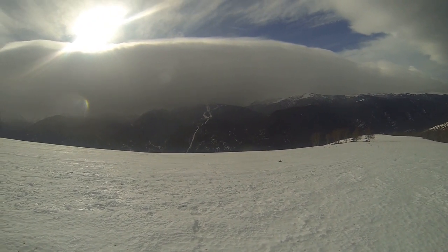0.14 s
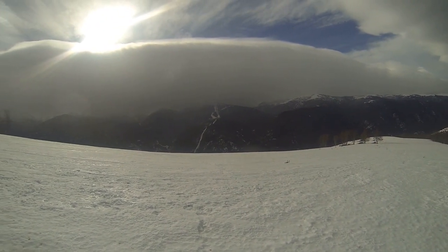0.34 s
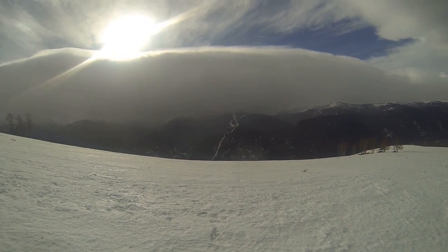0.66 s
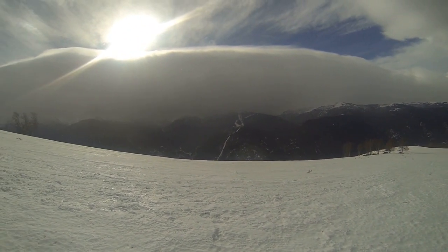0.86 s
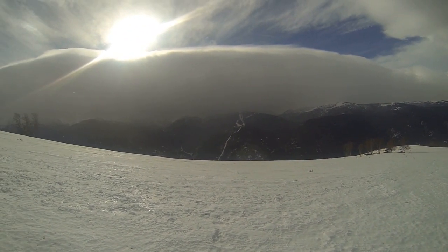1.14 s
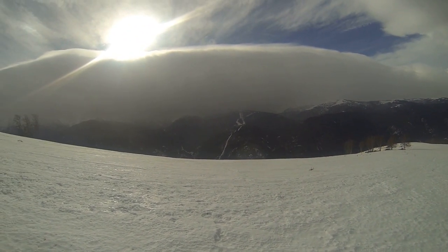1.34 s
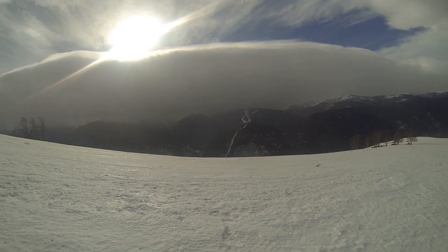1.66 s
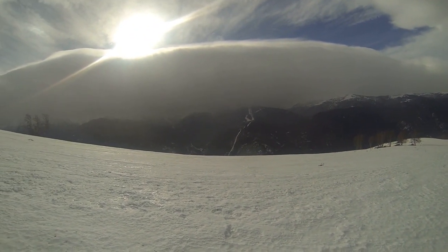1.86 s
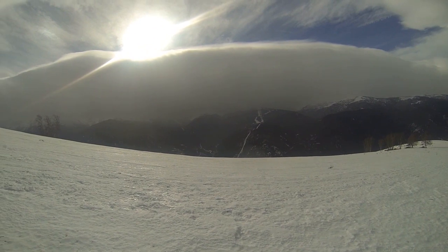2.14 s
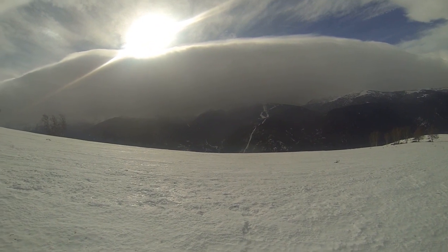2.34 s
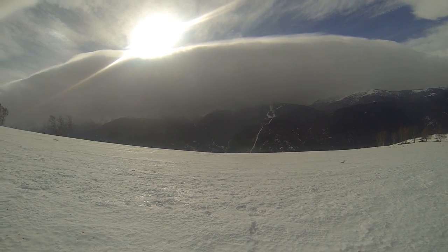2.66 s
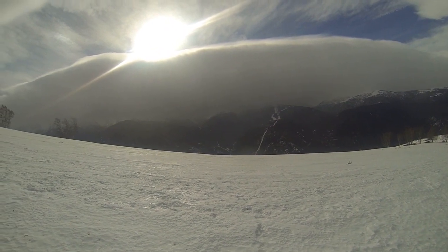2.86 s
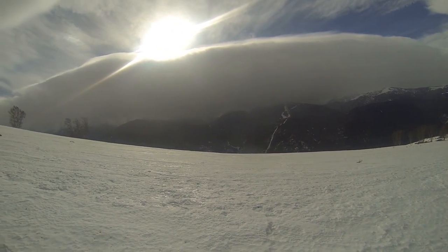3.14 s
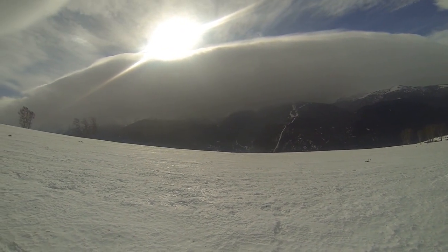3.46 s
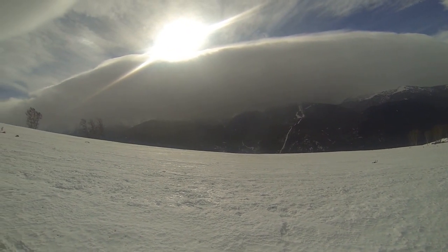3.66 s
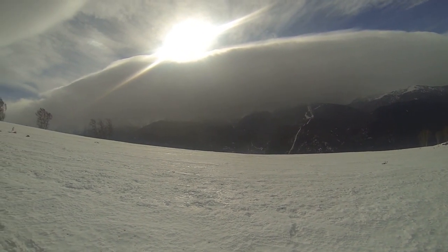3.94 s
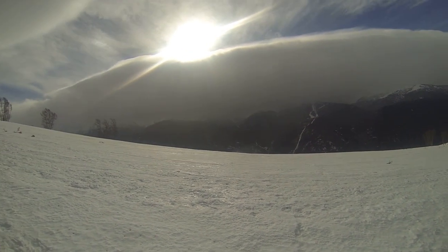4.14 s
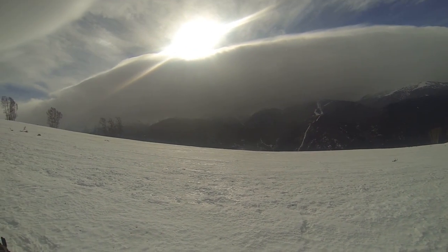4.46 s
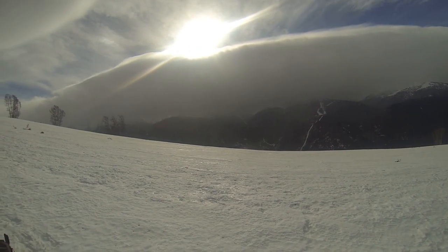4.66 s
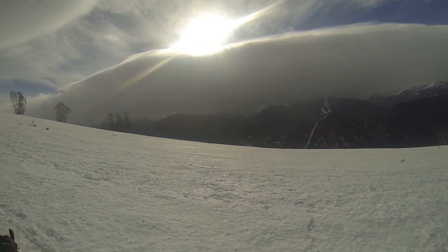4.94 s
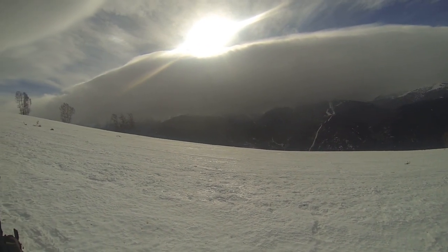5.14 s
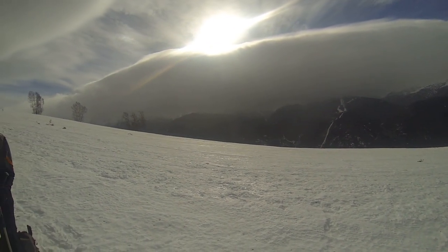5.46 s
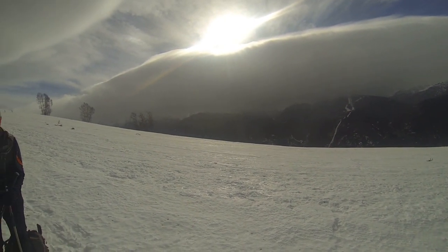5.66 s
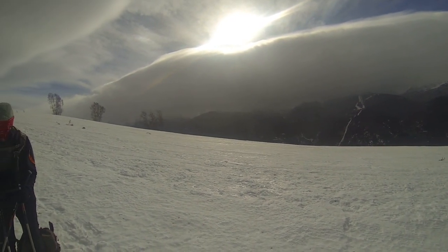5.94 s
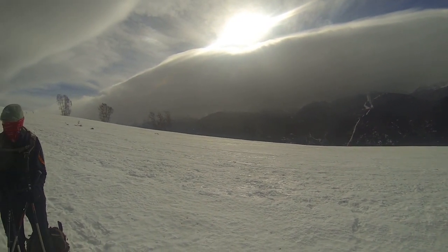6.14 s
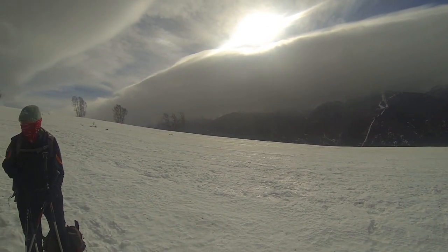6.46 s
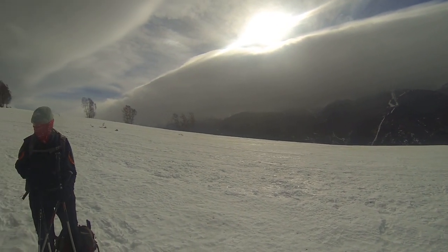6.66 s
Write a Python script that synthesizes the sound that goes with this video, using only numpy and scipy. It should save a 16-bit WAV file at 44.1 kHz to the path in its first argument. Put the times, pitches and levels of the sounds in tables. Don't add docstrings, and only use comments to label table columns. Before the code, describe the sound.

Deep, irregular wind thuds and a fluttering roar batter a small camera in the snow, with thin fizz and brief housing knocks.

```python
import sys
import numpy as np
from scipy import signal
from scipy.fft import rfft, irfft
from scipy.io import wavfile
from scipy.ndimage import uniform_filter1d, minimum_filter1d

SR = 44100
rng = np.random.default_rng(int(sys.argv[2]) if len(sys.argv) > 2 else 0)


def decibels_to_gain(level_db):
    exponent = np.asarray(level_db, float) / 20
    return 10 ** exponent


def persist_wave(psi):
    counts = np.round(np.clip(psi, -1, 1) * 32767).astype(np.int16)
    wavfile.write(sys.argv[1], SR, np.atleast_2d(counts).T)


N = 299880


def smooth_chance(rate_hz, low_hz=9):
    hz = np.fft.rfftfreq(N, 1 / SR)
    shape = (hz > low_hz) / np.sqrt(hz + 1) / (1 + (hz / rate_hz) ** 4)
    x = irfft(rfft(rng.standard_normal(N)) * shape, N)
    return x / x.std()


def add(mix, start_s, sound):
    part = mix[round(start_s * SR):][:len(sound)]
    part += sound[:len(part)]


def softened(x, size=90):
    return uniform_filter1d(uniform_filter1d(x, size), size)


def dulled(x, edge_hz):
    return signal.sosfilt(signal.butter(8, edge_hz, fs=SR, output="sos"), x)


def zero_phase_band(x, order, edge_hz, kind="low"):
    return signal.sosfiltfilt(signal.butter(order, edge_hz, kind, fs=SR, output="sos"), x)


def bumps(events, t):
    centre_s, length_s, level_db, colour_db = np.transpose(events)
    bell = np.exp(-(2 * (t[:, None] - centre_s) / length_s) ** 2)
    return bell @ level_db, bell @ colour_db


# time_s, speed_db,
# slicing_db (air sliding past the port), head_on_db (air hitting the port)
SLOPE_WIND = [(0.0, 3.5, -3.5, -1.5), (0.55, -7, -1.5, 1), (1.1, 0.5, -1, 2), (1.7, 1.1, -2, 2),
              (2.2, -1.7, 3, 5.5), (2.45, -4, -1.3, 3.5), (3.0, -1, -1.5, 1.5), (3.5, -0.4, 1.2, 3.5),
              (4.15, 3.5, 1, -2.5), (4.8, 0.5, 0.75, 1), (5.4, 1.54, 1.1, -2.5), (5.85, -4.5, 5.5, -4.5),
              (6.3, 0.5, 1.4, -4.5), (6.8, 3.5, -3, -3)]
# centre_s, length_s, level_db, brightness_db
PORT_PUFFS = [(0.3, 0.058, -2, -0.5), (0.51, 0.12, 2.5, 2), (0.77, 0.17, 7.5, -2), (1.03, 0.063, -5.5, 1.5),
              (1.145, 0.034, 1.5, -2), (1.21, 0.07, -2.5, 2.5), (1.43, 0.034, -5.5, 2),
              (1.51, 0.064, 5.5, -1), (1.61, 0.19, -2, -1), (1.74, 0.061, 3.5, -1.5),
              (1.9, 0.068, -4.5, -3.5), (2.3, 0.14, -4.5, 0.5), (2.7, 0.073, -3.5, -3),
              (2.79, 0.07, 0.8, -3), (3.07, 0.14, -4, 0), (3.17, 0.12, 5, 0.5), (3.36, 0.081, -3, 1.3),
              (3.645, 0.066, -6.5, 0.5), (3.76, 0.057, 2, 0), (3.95, 0.14, -2, 1), (4.38, 0.046, -5.5, 1.2),
              (4.67, 0.036, -3.5, 1.5), (5.0, 0.1, 3.5, -1), (5.24, 0.12, 0.5, -2.5), (5.31, 0.1, -1, 0.4),
              (5.725, 0.025, -6, 2), (6.215, 0.027, -3, -1.5), (1.355, .04, -1, 2.5), (.86, 0.036, 2.5, 3),
              (5.68, 0.029, 4.5, -1.5), (5.49, 0.039, 1.5, 1.5), (2.44, 0.047, 3, -3.5),
              (6.36, 0.034, 1.5, 1.5), (1.975, .03, 3, -1), (2.195, .03, 2, -1), (1.862, .012, 3, 0),
              (4.72, .05, -1, 1), (5.97, 0.044, 5, 0), (6.12, 0.11, 1.5, 0.2), (6.33, 0.032, -2, 1.5),
              (6.44, 0.059, -2.5, 0)]
# centre_s, length_s, level_db, depth_db
BIG_EDDIES = [(0.13, 0.038, 3.5, -1), (0.22, 0.079, 8, 1.5), (0.5, 0.058, 1, 2.5), (0.78, 0.12, 7.5, -1),
              (0.98, 0.078, 1.5, 6), (1.04, 0.037, -3, 9), (1.15, 0.075, 5.5, -2), (1.21, 0.072, -3.5, 5.5),
              (1.59, 0.1, 2, -0.5), (1.77, 0.11, 2, 1.5), (1.4, .1, 0, 1.5), (2.75, .08, 0.5, 3),
              (3.9, 0.068, -2.5, -0.5), (3.42, .06, 0, 0.5), (.35, 0.065, -1, -1.5),
              (1.91, 0.056, -13, 0.5), (2.03, 0.056, -5, 0.5), (1.7, .1, 2, -1.5), (1.3, .08, 1, 1),
              (2.2, .08, 1.5, 1), (2.4, .06, 2, 0), (2.09, 0.075, -7, -6), (2.31, 0.09, -7.5, -5),
              (2.54, 0.06, -6, -7), (2.99, 0.054, -6.5, -9), (3.21, 0.12, 5.5, -4), (3.62, 0.061, 0.3, 6.5),
              (4.05, 0.084, 3, 0.5), (4.33, 0.029, 1, -6), (4.43, 0.11, -3.5, -5.5),
              (4.61, 0.14, -1.5, 2.2), (4.93, 0.093, 5, 1.5), (5.11, 0.078, -13, -7), (5.32, 0.087, 4, 2.5),
              (5.74, 0.15, 3, 1.5), (5.97, 0.097, 7.5, 0), (6.13, 0.039, -1, -8), (6.27, 0.14, 6, 1),
              (6.5, 0.09, -1.5, 3.5), (6.59, 0.08, 3, 3)]
# centre_s, length_s, air_db, fizz_db
EDGE_JETS = [(.22, 0.037, 3, 2.5), (0.43, .07, 11, 2), (1.15, .05, 7, 7), (1.97, 0.026, 8, 6),
             (2.18, 0.056, 9.5, 1), (2.5, 0.063, 8.5, 2.5), (3.45, 0.034, -8, 2), (3.82, 0.2, 4.5, 1),
             (3.65, .05, 6, 0), (1.89, .04, 1, 0), (.285, .03, 4, 0.5), (1.2, .04, 2, 1), (2.69, .04, 3, 1),
             (5.73, .03, 3, 0.5), (5.9, .05, 1, 0.5), (3.8, .04, 4, 0), (1.33, .08, 0.5, 0.5),
             (2.95, .1, 4, 0.5), (4.16, 0.1, 4, 1), (4.09, 0.024, 3, 3), (4.53, .12, 4, 1.2),
             (4.6, 0.047, 2, 1), (4.17, .15, 0, 1.5), (5.0, .15, 0, 1.5), (1.975, .025, 0, 1),
             (5.23, .06, 11, 1), (6.25, 0.049, -1, 4.5)]
# mean_db, speed_share, slicing_share, head_on_share
WIND_LAYERS = [
    (-17, 0.033, 0.22, 0.39),
    (-19.5, 0.55, -0.24, 0.79),
    (-28.5, 1.17, 1.2, 0.01),
    (-44, 0.7, -0.39, 0.01),
    (-66, 1.7, 0.42, 0.42),
]


def gusts():
    t = np.arange(0, N + 64, 64) / SR
    time_s, *controls = np.transpose(SLOPE_WIND)
    slow = np.array([np.interp(t, time_s, control) for control in controls])
    puff, bright = bumps(PORT_PUFFS, t)
    buffet, deep = bumps(BIG_EDDIES, t)
    jet, fizz = bumps(EDGE_JETS, t)
    air = 1.2 * (puff + bright) + jet
    quick = (buffet + deep, buffet - deep, puff - bright, puff + bright + fizz, air)
    levels = []
    for (mean_db, *shares), quick_db in zip(WIND_LAYERS, quick):
        level_db = mean_db + np.array(shares) @ slow + quick_db
        levels.append(np.interp(np.arange(N) / SR, t, level_db))
    return levels


# frequency_hz, level_db (per Hz)
EDDY_PRESSURE = [(4, -21), (10, -23), (30, -15), (80, -22.5), (200, -31.5), (500, -42.5), (1350, -60),
                 (2500, -69.5), (4200, -79.5), (6000, -91.5), (7400, -95), (10800, -96.5), (11500, -102),
                 (14000, -111), (16000, -122)]
# centre_hz, width_hz, boost_db
HOUSING_RESONANCES = [(878, 780, 7), (1820, 690, 5), (3030, 1300, 4), (3860, 280, 0), (4300, 360, -5.5),
                      (5080, 780, 5), (6600, 350, 3), (8660, 1200, 4.5)]


def wind(edges_hz=(70, 350, 1900, 5800), shared_db=(.6, .7, .6, .45, .5), own_db=(.4, .6, .6, .7, .9),
         grit_db=(0, .6, 1.2, 1.4, 1.6)):
    hz = np.fft.rfftfreq(N, 1 / SR) + .01
    frequency_hz, level_db = np.transpose(EDDY_PRESSURE)
    colour_db = np.interp(np.log(hz), np.log(frequency_hz), level_db)
    for centre_hz, width_hz, boost_db in HOUSING_RESONANCES:
        colour_db += boost_db / (1 + (2 * (hz - centre_hz) / width_hz) ** 2)
    noise = rfft(rng.standard_normal(N)) * decibels_to_gain(colour_db)
    below = [0 * hz] + [1 / (1 + (hz / edge) ** 4) for edge in edges_hz] + [1 + 0 * hz]
    flutter, grit = smooth_chance(28), smooth_chance(470, 27)
    out = np.zeros(N)
    for k, gust_db in enumerate(gusts()):
        layer = irfft(noise * (below[k + 1] - below[k]), N)
        flicker_db = shared_db[k] * flutter + own_db[k] * smooth_chance(53) + grit_db[k] * grit
        out += layer / layer.std() * decibels_to_gain(gust_db + flicker_db)
    return out


def ragged_top(x, floor_db=-12):
    luck = np.repeat(rng.random(N // 2048 + 1), 2048)[:N]
    for low_hz, high_hz, lost_share in ((11300, 12400, .12), (12400, 13600, .22), (13600, 16000, .4)):
        band = zero_phase_band(x, 5, [low_hz, high_hz], "band")
        lost = softened(1. * (luck < lost_share), size=200)
        x = x - band * (1 - decibels_to_gain(floor_db)) * lost
    return x


def electronics(whine_hz=11000, whine_db=-89, hiss_db=-99):
    whine = decibels_to_gain(whine_db) * np.sin(2 * np.pi * whine_hz * np.arange(N) / SR)
    return whine + decibels_to_gain(hiss_db) * dulled(rng.standard_normal(N), 11000)


# centre_s, push (-1..1), length_s, duck_db (below 0: no duck), click_db
PORT_BLOWS = [(0.1275, -.6, 0.0089, -3.5, -70), (0.139, .6, 0.0071, -3.5, -66),
              (0.205, -0.51, 0.01, 0.5, -65), (.2275, -0.42, 0.0052, -1.5, -64),
              (.2734, -0.89, .008, 2, -63), (0.4875, -0.72, .012, -2, -64), (0.5, 0.63, .009, 0.5, -58),
              (0.745, -0.37, 0.0025, 0.5, -62), (0.7695, -0.77, 0.0087, -1, -64),
              (.7946, -0.14, .007, -1.5, -64), (0.806, 0.78, .008, 2.5, -54),
              (0.8546, -0.74, 0.0032, 0.5, -56), (1.131, .6, .004, 2.5, -61), (1.151, -.6, 0.0099, -1, -66),
              (1.161, 0.82, 0.004, -1, -62), (1.4053, -.75, 0.0036, -0.5, -55),
              (1.5478, .65, 0.0066, 4, -48), (1.618, -.6, .005, 3, -56), (1.692, 0.58, 0.0033, -1.5, -62),
              (1.7295, -0.5, 0.0046, 1, -64), (1.866, 0.93, .005, 2.5, -50), (2.24, 0.51, 0.0069, 1.5, -51),
              (2.7483, -0.57, 0.0051, 0, -59), (2.774, -0.53, 0.003, 0, -64),
              (3.1743, .7, 0.0032, 3.5, -58), (3.2294, -0.56, 0.0054, 1.5, -58),
              (3.446, -0.63, .005, 1.5, -52), (3.5253, 0.57, 0.0026, -2.5, -57), (3.555, .65, .005, 2, -53),
              (3.6177, 0.71, .006, 2, -54), (3.7787, -0.67, .003, 1.5, -62), (3.8787, 0.62, 0.0042, 1, -50),
              (3.8877, -1, .006, 5.5, -62), (4.3365, 0.86, 0.0032, 1.2, -52), (4.92, .65, .005, 2.5, -57),
              (5.291, .7, .004, 3, -54), (5.3487, .65, 0.0066, -0.5, -62), (6.2253, 0.77, 0.01, -2, -62),
              (6.2503, -0.56, .009, 2, -58), (6.3035, -0.93, .006, 1.5, -51)]


def blows(flow, swept_share=0.71):
    out, swept = np.zeros(N), np.zeros(N)
    for centre_s, push, length_s, _, _ in PORT_BLOWS:
        u = np.arange(-3 * length_s, 3 * length_s, 1 / SR) / length_s
        lump = np.exp(-(2.2 * u) ** 2) - .3 * np.exp(-(.7 * u) ** 2)
        add(out, centre_s - 3 * length_s, push / .7 * lump * np.hanning(len(u)))
        add(swept, centre_s - 3 * length_s, np.exp(-u ** 2))
    low = zero_phase_band(flow, 2, 250)
    return flow + out - np.clip(swept_share * swept, 0, 1) * low


# centre_s, length_s, level_db
HISS_PATCHES = [(.18, .12, -84), (.38, .04, -87), (.61, .05, -87), (.72, .05, -86), (.8, .05, -86),
                (1.08, .05, -86), (1.64, .06, -85), (2.34, .05, -87), (2.5, .05, -86), (2.82, .06, -85),
                (2.9, .04, -87), (3.04, .05, -86), (3.31, .1, -85), (3.42, .05, -84), (3.52, .05, -84),
                (3.61, .05, -86), (3.96, .04, -86), (4.92, .07, -84), (5.75, .08, -86), (5.92, .06, -86),
                (6.12, .04, -86), (6.24, .07, -84), (6.31, .04, -85)]


def shimmer():
    t = np.arange(N) / SR
    gate = np.zeros(N)
    for centre_s, length_s, level_db in HISS_PATCHES:
        gate += decibels_to_gain(level_db) * (abs(t - centre_s) < length_s / 2)
    band = signal.butter(6, [11200, 15700], "band", fs=SR, output="sos")
    return 2 * softened(gate, size=200) * signal.sosfilt(band, rng.standard_normal(N))


# start_s, ring_db, pitch_hz, t60_s, edge_db
HOUSING_TICKS = [(.317, -52, 8500, .004, -60), (.322, -32, 4300, .004, -56), (.3225, -37, 5600, .004, -62),
                 (.334, -55, 9000, .004, -58), (.409, -28, 3500, .004, -60), (.4095, -33, 5000, .004, -60),
                 (.447, -25, 1960, .012, -62), (.479, -51, 8700, .004, -55), (.493, -21, 1880, .014, -60),
                 (.501, -45, 5500, .004, -54), (.506, -21, 1950, .014, -57), (.514, -24, 1880, .014, -60),
                 (.517, -30, 3300, .005, -57), (.519, -22, 1930, .012, -60), (.547, -22, 1870, .015, -58),
                 (.554, -25, 2840, .007, -60), (.572, -24.5, 2800, .006, -64), (.577, -22, 3000, .006, -43),
                 (.578, -30, 4600, .006, -55), (.5785, -34, 6300, .005, -60), (.607, -7, 1120, .008, -64),
                 (.6075, -15, 1900, .007, -64), (.621, -50, 8000, .004, -62), (1.132, -15, 2010, .012, -55),
                 (1.141, -18, 1400, .012, -60), (1.651, -45, 5500, .004, -56),
                 (1.8665, -32, 3600, .004, -60), (3.443, -36, 4800, .004, -60),
                 (3.607, -40, 5000, .004, -54), (3.747, -38, 5200, .004, -52),
                 (4.517, -45, 8700, .004, -45), (4.771, -40, 5200, .004, -51),
                 (5.085, -33, 5400, .007, -58), (5.3995, -27, 3300, .004, -40),
                 (5.4, -41, 12500, .004, -42), (5.4002, -31, 6300, .005, -50),
                 (5.4004, -31, 4500, .004, -60), (5.4006, -36, 8600, .004, -60),
                 (6.305, -44, 6760, .012, -56)]


def ticks():
    out, t = np.zeros(N), np.arange(1200) / SR
    edges = signal.lfilter([1, -1], [1, -1.25, .55], rng.standard_normal((len(HOUSING_TICKS), 1200)))
    for (start_s, ring_db, pitch_hz, t60_s, edge_db), edge in zip(HOUSING_TICKS, edges):
        upper_hz = min(1.3 * pitch_hz, 13000)
        pair = np.sin(2 * np.pi * pitch_hz * t) + 0.15 * np.sin(2 * np.pi * upper_hz * t)
        ring = decibels_to_gain(ring_db - 60 * t / t60_s) * pair * (1 - np.exp(-t * pitch_hz / 1.6))
        add(out, start_s, ring + decibels_to_gain(edge_db - 60 * t / 0.0057) * dulled(edge, 12000))
    return dulled(out, 13600)


# start_s, peak_db, pitch_hz
EDGE_SNAPS = [(1.087, -18.5, 584), (1.475, -19.5, 573), (1.52, -12, 501), (1.763, -12.5, 674),
              (1.891, -24, 637), (1.974, -12.5, 519), (2.11, -21, 585), (2.328, -28, 568),
              (2.442, -19.5, 665), (2.687, -21, 525), (2.948, -19, 646), (3.305, -20.5, 567),
              (3.43, -13, 523), (3.571, -20, 721), (4.429, -16, 533), (4.809, -14, 592), (5.503, -16, 662),
              (5.736, -22, 554), (5.951, -15.5, 503), (6.049, -16.5, 833), (6.219, -15, 797),
              (6.457, -20.5, 530)]


def snaps(flow, hush_depth=.6, hush_s=.012):
    out, hush, t = np.zeros(N), np.zeros(N), np.arange(1200) / SR
    thinning = hush_depth * np.arange(0, hush_s, 1 / SR) ** .5 / hush_s ** .5
    for start_s, peak_db, pitch_hz in EDGE_SNAPS:
        turns = pitch_hz * t * (1 - 8 * t)
        fade = decibels_to_gain(peak_db - 30 * turns / 4)
        add(out, start_s, fade * np.sin(2 * np.pi * turns) * np.minimum(t / 0.0011, 1))
        add(hush, start_s - hush_s, thinning)
    high = zero_phase_band(flow, 2, [400, 3000], "band")
    return flow + out - softened(hush, size=30) * high


def scene():
    faint = electronics()
    flow = snaps(blows(wind()))
    knocks = ticks()
    return (ragged_top(flow) + knocks + faint + shimmer())[None]


def low_pass(x):
    return signal.sosfilt(signal.butter(12, 15720, fs=SR, output="sos"), x)


def record(dry, ceiling=0.84, recovery_s=0.049):
    t, duck_db, clicks = np.arange(N) / SR, np.zeros(N), np.zeros(N)
    steps = signal.lfilter([1], [1, -.85], rng.standard_normal((len(PORT_BLOWS), 176)))
    steps = steps * np.hanning(176)
    for (centre_s, _, length_s, db, click_db), step in zip(PORT_BLOWS, steps):
        recovery = np.exp(-np.maximum(t - centre_s, 0) / recovery_s)
        duck_db += max(db, 0) * (t > centre_s + .3 * length_s) * recovery
        add(clicks, centre_s - .001, decibels_to_gain(click_db + 5.5) * step)
    x = (dry - dry.mean()) * decibels_to_gain(-softened(duck_db))
    held = minimum_filter1d(np.minimum(ceiling / (abs(x) + 1e-9), 1), size=300)
    mix = x * softened(held, size=170) + dulled(clicks, 10500)
    return low_pass(mix)


dry = scene()
out = record(dry)
persist_wave(out)
```